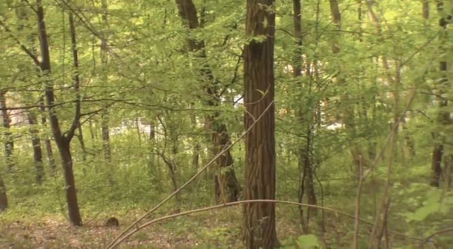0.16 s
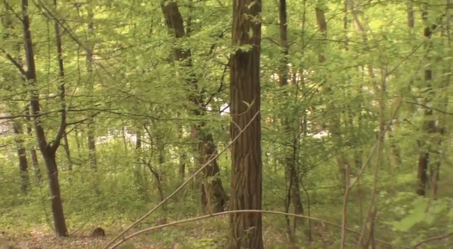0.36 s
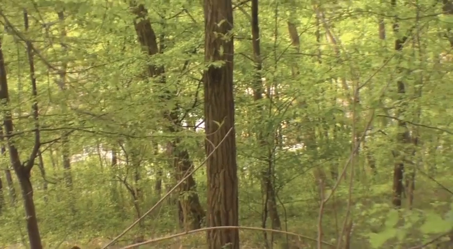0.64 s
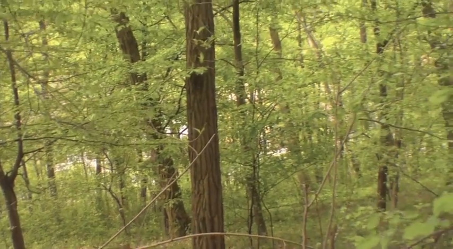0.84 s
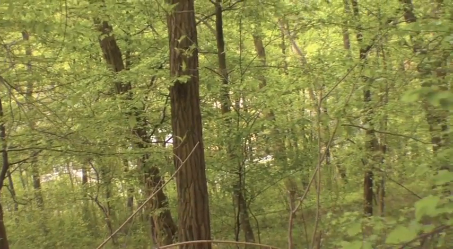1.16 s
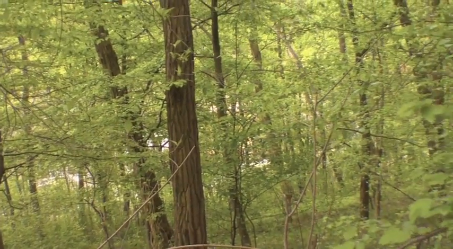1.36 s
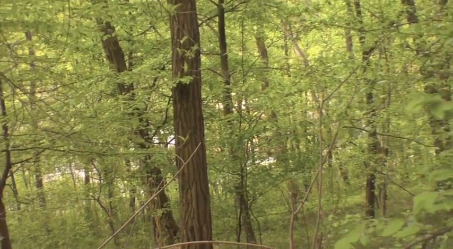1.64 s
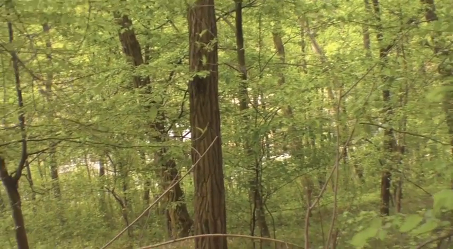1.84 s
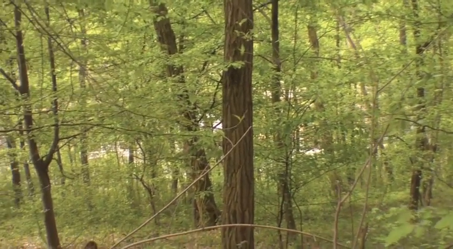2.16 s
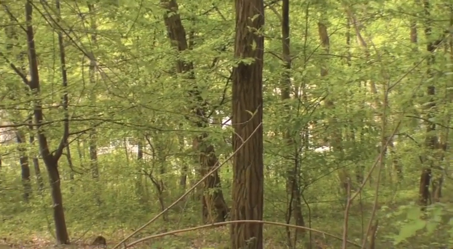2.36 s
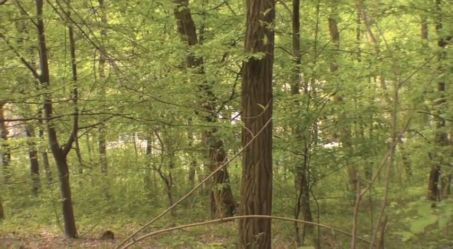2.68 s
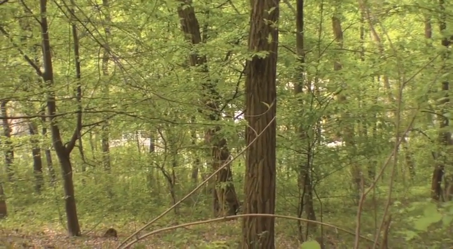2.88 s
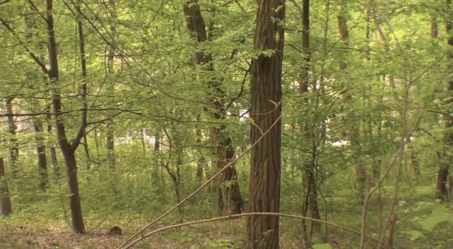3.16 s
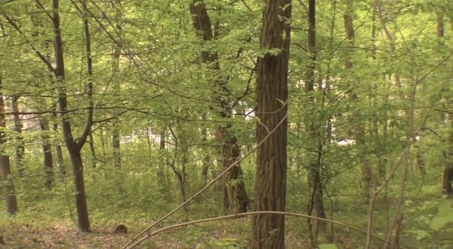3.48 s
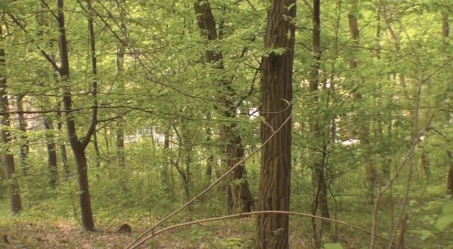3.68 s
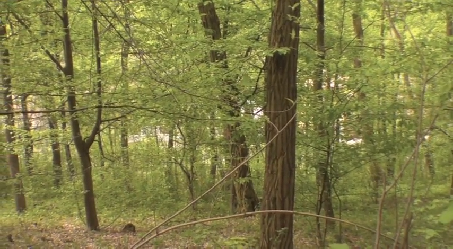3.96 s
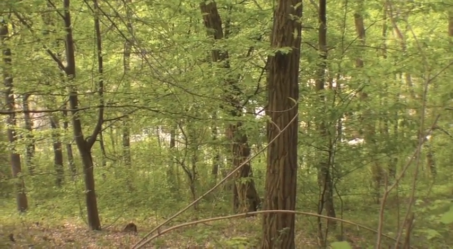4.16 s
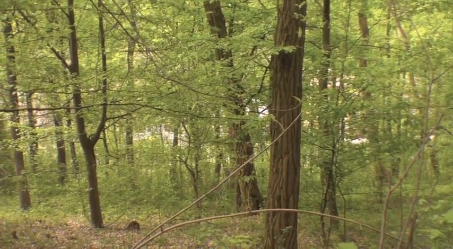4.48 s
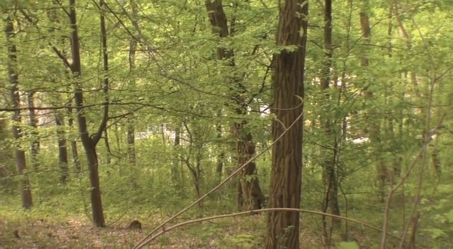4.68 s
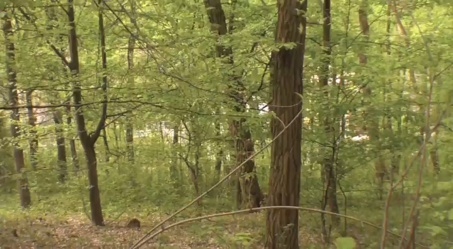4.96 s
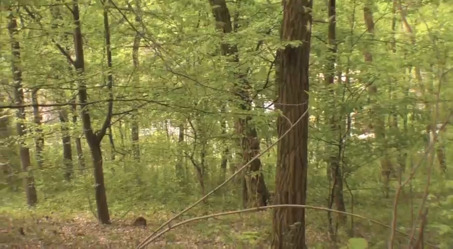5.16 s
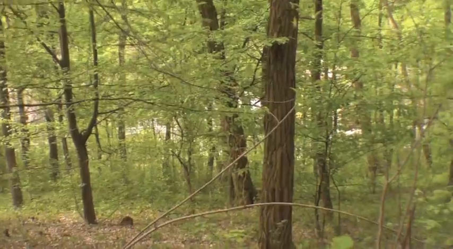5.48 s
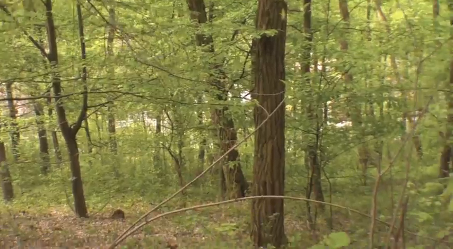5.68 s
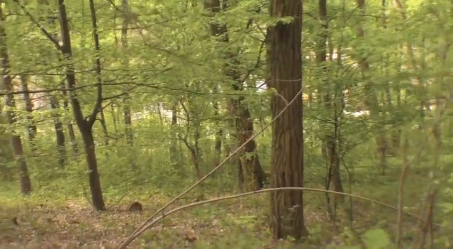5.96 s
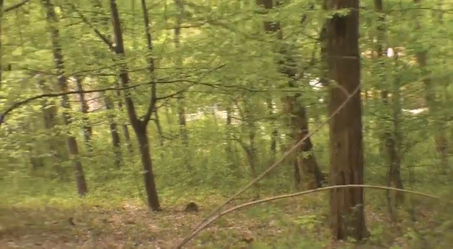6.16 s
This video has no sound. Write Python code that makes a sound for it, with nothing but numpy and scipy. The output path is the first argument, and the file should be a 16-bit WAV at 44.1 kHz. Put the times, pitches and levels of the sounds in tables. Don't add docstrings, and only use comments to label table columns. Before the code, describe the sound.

A stereo microphone stands in a leafy wood, with a soft, bass-heavy hush and a low engine hum from beyond the trees. From 0 to 2 s, small birds are sparse: faint chirps, quick trills and three repeated climb-and-dive phrases between 0.5 and 1.2 s. Tiny dry-leaf ticks come now and then; soft wind thumps pass near 1.3 and 1.9 s. The hum is strongest around 2.6 s. From about 2.8 s, distant flocks thicken the song, with a bright whistle at 3.8 s. Another engine falls in pitch until 4.3 s, then recovers and pulls, while road hiss swells to the end. Between 4.4 and 5.3 s the nearest bird gives clear high glides and two brief lower hoots amid rapid trills. Leaves crackle close by at 5.3-5.6 s, snap again around 6 s, and crunch loudly from 6.2 s until the cut at 6.3 s.

```python
import sys
import numpy as np
from scipy import signal
from scipy.io import wavfile
from scipy.ndimage import map_coordinates

SR = 44100
rng = np.random.default_rng(int(sys.argv[2]) if len(sys.argv) > 2 else 0)


def magnitude_from_level(level_db):
    exponent = np.asarray(level_db, float) / 20
    return 10 ** exponent


def bounce(signal):
    frames = np.transpose(np.atleast_2d(signal))
    limited = np.clip(frames, -1, 1)
    pcm = np.round(limited * 32767).astype(np.int16)
    wavfile.write(sys.argv[1], SR, pcm)


N = 278929
TIME = np.arange(N) / SR

# frequency in Hz, likeness from 0 to 1.
FIELD_LIKENESS = [(40, 0.44), (150, 0.47), (380, 0.88), (950, 0.92), (2400, 0.95), (6000, 0.32),
                  (15000, 0.13)]


def rms_one(x):
    return x / np.sqrt(np.mean(x ** 2) + 1e-20)


def in_time(rows):
    s, *columns = np.transpose(rows)
    return np.array([np.interp(TIME, s, column) for column in columns])


def at_hz(points, hz):
    point_hz, value = np.transpose(points)
    return np.interp(np.log(hz), np.log(point_hz), value)


def drift(rate_hz):
    stride = 40
    pole = np.exp(-2 * np.pi * stride * rate_hz / SR)
    settle = 2000
    white = rng.standard_normal(N // stride + settle + 2)
    slow = signal.lfilter([1], [1, -2 * pole, pole * pole], white)[settle:]
    return np.interp(np.arange(N) / stride, np.arange(len(slow)), rms_one(slow))


def bouts(rows, slopes):
    s, hold, db = np.transpose(rows)[:, :, None]
    swell_db = slopes[0] * np.maximum(s - TIME, 0)
    fade_db = slopes[1] * np.maximum(TIME - s - hold, 0)
    power = np.sum(magnitude_from_level(2 * (db - swell_db - fade_db)), axis=0)
    return 10 * np.log10(power + 1e-30)


def pair(mid, side, alike):
    alike = np.clip(alike, 0, 1)
    return np.sqrt(1 + alike) * mid + np.sqrt(1 - alike) * side * [[1], [-1]]


def banded(source, spectrum, likeness, patchy_db):
    # frequency in Hz, difference in dB.
    left_over_right = [(60, 0), (380, -1), (2380, -0.5), (15000, -1.0)]
    out, edges = 0, 20 * 2 ** np.arange(0, 9.9, .5)
    for k, (low, high) in enumerate(zip(edges, edges[1:])):
        hz = min(np.sqrt(low * high), 14400)
        if spectrum[0][0] < high and low < spectrum[-1][0]:
            band = signal.butter(2, [low, high], "band", fs=SR, output="sos")
            mid, side = signal.sosfilt(band, source[k % len(source)])
            gain = magnitude_from_level(at_hz(spectrum, hz) + patchy_db * drift(8.1))
            lean = magnitude_from_level(np.array([[.5], [-.5]]) * at_hz(left_over_right, hz))
            out = out + gain * lean * pair(mid, side, at_hz(likeness, hz))
    return rms_one(out)


def still_air():
    # frequency in Hz, density in dB per Hz.
    spectrum = [(15, -34), (25, -1), (59, -6), (157, -13.5), (373, -17.5), (575, -14.5), (1020, -19),
                (1480, -19.5), (1840, -23.5), (3250, -21.5), (6380, -35), (11500, -36), (14400, -34.5),
                (16000, -53)]
    noise = rng.standard_normal((2, 2, N))
    return magnitude_from_level(-41 + 0.12 * drift(0.42)) * banded(noise, spectrum, FIELD_LIKENESS, patchy_db=0.5)


def traffic():
    # time in seconds, level in dB.
    passing = [
        (0, -65),
        (3.2, -56),
        (4.5, -47.5),
        (5.2, -47),
        (5.7, -44.5),
        (6.32, -43),
    ]
    # frequency in Hz, density in dB per Hz.
    spectrum = [(150, -2), (300, -1), (700, -1), (1300, -1), (2200, -9), (3500, -12)]
    noise = rng.standard_normal((2, 2, N))
    return magnitude_from_level(in_time(passing)[0]) * banded(noise, spectrum, FIELD_LIKENESS, patchy_db=3.5)


def engines():
    # time in seconds, firing rate in Hz.
    gears = [
        (3.1, 88.8),
        (3.47, 71.3),
        (3.8, 57.3),
        (3.97, 50.47),
        (4.29, 47.55),
        (4.53, 66.8),
        (5.66, 66.8),
        (5.85, 68.8),
        (6.32, 69.6),
    ]
    # start in seconds, hold in seconds, level in dB.
    pulls = [
        (3.3, 3.1, -48),
        (3.68, 0.24, -34.5),
        (4.47, .01, -36.5),
        (5.03, 0.59, -34),
        (6.07, 0.019, -33.5),
    ]
    # time in seconds, firing rate in Hz, level in dB, second order in dB.
    steady = [
        (0, 44.2, -47.5, -49.5),
        (1.9, 46.72, -49, -54),
        (2.6, 47.34, -41.5, -52.5),
        (3.5, 48.23, -47, -61),
        (6.32, 48.7, -50.5, -54),
    ]
    hz, db = in_time(gears)[0], bouts(pulls, (53, 59))
    shifting = magnitude_from_level(db + 0.63 * drift(16.0)) * np.sin(2 * np.pi * np.cumsum(hz) / SR)
    hz, db, second_db = in_time(steady)
    phase = 2 * np.pi * np.cumsum(hz) / SR + .5 * drift(2.0)
    drone = magnitude_from_level(db + 1.7 * drift(21.0)) * np.sin(phase)
    drone += magnitude_from_level(second_db + 1.0 * drift(6.7)) * np.sin(2 * phase)
    return np.sqrt(2) * (shifting + drone) * magnitude_from_level(np.array([[.8], [-.8]]))


def wind():
    # start in seconds, hold in seconds, level in dB.
    gusts = [
        (1.28, 0.021, -41.5),
        (1.87, .02, -34.5),
    ]
    band = signal.butter(3, [14, 36], "band", fs=SR, output="sos")
    lumps = signal.sosfilt(band, rng.standard_normal((2, N)))
    breeze = magnitude_from_level(-57.5 + 2.5 * TIME)
    return (breeze + magnitude_from_level(bouts(gusts, (87, 61)))) * rms_one(pair(*lumps, 0.12))


def leaves():
    # start in seconds, hold in seconds, crackle level in dB.
    tread = [(0, 0.24, -65), (2.17, 0.22, -61.5), (5.3, 0.79, -56.5), (5.32, 0.046, -53), (5.4, 0.1, -49),
             (5.47, 0.028, -53), (5.52, 0.053, -44), (5.57, 0.016, -42.5), (6.09, 0.091, -50.5),
             (6.227, 0.046, -23), (6.3, .03, -23)]
    # start in seconds, peak in dB, ringing frequency in Hz.
    snaps = [(0.064, -32, 12300), (0.0997, -38, 10900), (0.129, -35, 8020), (0.524, -35, 7860),
             (1.1478, -40, 8070), (1.7968, -40, 12100), (2.28, -36, 11000), (3.106, -32.5, 8110),
             (3.506, -27, 13500), (3.507, -38, 7000), (4.4603, -35, 7550), (5.2215, -39, 12400),
             (5.2676, -40, 7150), (5.314, -34, 10700), (5.3642, -32, 8820), (5.403, -29, 13260),
             (5.4454, -33, 13600), (5.4618, -31, 10600), (5.5253, -24, 12350), (5.546, -20.5, 7000),
             (5.6287, -37, 13100), (5.8423, -29, 10940), (5.868, -30, 8200), (6.0586, -35, 8300),
             (6.0796, -33, 9900), (6.139, -31, 12560), (6.177, -47, 11400), (6.207, -10, 12400),
             (6.202, -18, 5160), (6.27, -23, 8980), (6.316, -9.5, 7000)]
    # frequency in Hz, density in dB per Hz.
    crackle = [(900, -33), (1600, -10.5), (2700, -10), (4700, -5.5), (7000, -6), (9000, -13), (12000, -6),
               (15000, 10)]
    crunch = [(130, -3), (280, 2.5), (600, 6.5), (1200, -0.5), (2500, 2), (4000, -43)]
    # frequency in Hz, left-right likeness from 0 to 1.
    likeness = [(200, 1), (4000, 1), (12000, 0.81)]
    breaks_per_s, snap_decay_s = 11000, .0008
    sizes = magnitude_from_level(1.1 * np.minimum(rng.exponential(1, (3, 1, N)), 4))
    happens = rng.random((3, 1, N)) < breaks_per_s / SR
    breaks = sizes * rng.standard_normal((3, 2, N)) * happens + 1e-18
    out = magnitude_from_level(4.5) * banded(breaks, crackle, likeness, patchy_db=0.9)
    out += magnitude_from_level(-7.0) * banded(breaks, crunch, likeness, patchy_db=.5)
    out *= magnitude_from_level(bouts(tread, (600, 300)))
    t = np.arange(200) / SR
    for s, db, hz in snaps:
        band = signal.butter(2, [0.75 * hz, min(1.25 * hz, 18000)], "band", fs=SR, output="sos")
        snap = signal.sosfilt(band, rng.standard_normal(len(t)) * np.exp(-t / snap_decay_s))
        snap = magnitude_from_level(db) * snap / np.max(np.abs(snap)) * magnitude_from_level(np.array([[-.6], [.6]]))
        at = int(s * SR)
        out[:, at:at + len(t)] += snap[:, :N - at]
    return out


def add(out, s, length, first_hz, middle_hz, last_hz, db, fade_db=0, swell_db=0):
    u = np.linspace(0, 1, max(int(length * SR), 8))
    hz = first_hz * 2 * (u - .5) * (u - 1) + middle_hz * 4 * u * (1 - u) + last_hz * 2 * u * (u - .5)
    phase = 2 * np.pi * np.cumsum(hz) / SR
    edge = np.clip(np.minimum(u, 1 - u) * length / 0.0034, 0, 1)
    edge = edge * magnitude_from_level(-fade_db * u ** 2 - swell_db * (2 * u - 1) ** 2)
    note = magnitude_from_level(db) * np.sqrt(2) * edge * (np.sin(phase) + magnitude_from_level(-29) * np.sin(2 * phase))
    at = int(s * SR)
    out[at:at + len(u)] += note[:N - at]


def glide(s, length, hz, rise_hz, db):
    early = 0.593
    return s, length, hz - early * rise_hz, hz, hz + (1 - early) * rise_hz, db


def arch(s, length, hz, depth, db):
    return s, length, hz * (1 - depth), hz, hz * (1 - depth), db


def hook(s, length, hz, rise_hz, db):
    return s, length, hz - rise_hz, hz - (1 - 0.66) * rise_hz, hz, db


def singers(notes, flutter_db):
    out = np.zeros(N)
    for note in notes:
        add(out, *note)
    tremble = np.arange(N) + 1.0 * drift(45.0)
    return map_coordinates(out, [tremble], order=3) * magnitude_from_level(flutter_db * drift(70.0))


def phrase(s, turn, db, dive_db):
    climb_hz, dive_hz = (2360, 3150, 4150), (3550, 2850, 2390, 2130, 1880)
    pip_s, climb_s, plunge_s, dive_s = .022, .045, .024, .056
    return [glide(s - pip_s, pip_s, 2270, 120, db - 3.0),
            (s, climb_s, *climb_hz, db, 7),
            (s + turn, plunge_s, *dive_hz[:3], dive_db - 4, -4),
            (s + turn + plunge_s - .003, dive_s - plunge_s, *dive_hz[2:], dive_db, 7)]


def song():
    # start of the climb in seconds, seconds until the dive, level in dB, dive level in dB.
    phrases = [
        (.51, .058, -43, -43),
        (.775, .057, -42, -47),
        (1.05, .054, -45, -43),
    ]
    # start in seconds, middle in Hz, drop in Hz, level in dB.
    flicks = [(0.132, 4040, 530, -49), (.618, 3330, 697, -45), (1.357, 5200, 850, -51),
              (1.663, 3280, 750, -47.5), (2.163, 3980, 700, -53), (2.264, 3600, 1190, -46),
              (2.327, 4050, 1610, -49), (2.382, 2900, 450, -51), (2.633, 2820, 600, -54),
              (2.711, 4210, 1000, -41), (2.736, 2840, 1000, -53), (2.998, 3020, 820, -44),
              (3.201, 3080, 500, -50), (3.522, 3220, 400, -45), (4.522, 3906, 360, -56),
              (1.747, 3550, 500, -47), (4.11, 3247, 400, -45), (4.935, 3150, 450, -45),
              (.848, 3000, 900, -50), (5.968, 6400, 1720, -43.5), (1.733, 5350, 300, -59),
              (2.612, 4050, 600, -55)]
    # start and length in seconds, middle in Hz, dB.
    slides = [(.575, 0.036, 5820, -60), (2.341, 0.026, 3150, -45), (2.853, 0.04, 2873, -53),
              (3.035, 0.057, 2516, -49), (3.122, 0.017, 4950, -48), (3.2, 0.045, 6800, -63),
              (3.332, 0.13, 2610, -56), (3.542, 0.051, 2670, -44.5), (3.907, 0.099, 3530, -50),
              (4.106, 0.016, 5700, -53), (3.345, 0.074, 3940, -52), (5.31, 0.037, 5740, -41.5),
              (5.374, 0.034, 4110, -44), (3.589, 0.04, 2490, -46)]
    # start and length in seconds, middle in Hz, rise in Hz, level in dB.
    rises = [(.01, 0.013, 3120, 600, -47), (.08, 0.012, 2970, 600, -43), (.154, 0.017, 3100, 498, -49),
             (.695, .05, 3340, 300, -49.5), (1.991, 0.0096, 4960, 1097, -53),
             (2.66, 0.022, 4170, 1100, -44), (2.768, 0.033, 3510, 480, -43), (2.624, .012, 3180, 298, -47),
             (3.03, .028, 3330, 650, -44), (3.505, .022, 3680, 102, -43), (3.414, 0.066, 5400, 502, -73),
             (3.63, 0.096, 5650, 448, -64), (3.795, 0.081, 5300, 500, -56), (3.949, 0.042, 2870, 143, -43),
             (4.087, 0.039, 3730, 123, -43), (4.127, 0.052, 2830, -480, -40),
             (4.745, 0.24, 3770, -130, -50), (5.161, 0.0235, 3565, 261, -36),
             (4.364, 0.053, 3206, 258, -36), (4.655, 0.039, 2850, 702, -41.5), (4.69, .02, 4100, 1500, -43),
             (4.855, .02, 3315, 1500, -46), (5.243, 0.025, 3515, 150, -35), (5.731, 0.017, 2890, 500, -43),
             (1.488, 0.014, 3390, 900, -52), (2.802, .03, 2920, -700, -41)]
    # start and length in seconds, top in Hz, rise in Hz, level in dB.
    hooks = [
        (0.487, 0.05, 4160, 550, -47.5),
        (5.05, .025, 4420, 400, -47),
        (5.15, .02, 4610, 300, -48),
        (5.225, .022, 4580, 550, -45),
        (5.794, 0.052, 3280, 616, -41.5),
        (5.871, 0.027, 3110, 448, -38.5),
        (3.0, 0.0274, 3800, 350, -44),
    ]
    # start and length in seconds, pitch in Hz, level in dB.
    held = [(.303, 0.016, 3820, -47), (.715, 0.059, 3510, -51), (1.366, 0.05, 5720, -56.5),
            (1.715, 0.022, 5460, -51), (2.054, 0.045, 3200, -56), (2.324, 0.02, 4150, -48.5),
            (2.632, .038, 3655, -44), (2.68, .036, 4790, -46), (3.135, 0.083, 2520, -52.5),
            (3.957, 0.059, 2657, -47.5), (3.578, 0.22, 2320, -57), (3.648, 0.052, 3820, -48.5),
            (3.84, 0.059, 2860, -46.5), (4.167, 0.057, 2597, -42.5), (3.205, .065, 4300, -50),
            (3.635, .03, 4300, -50), (4.355, .02, 4650, -49), (4.87, .035, 4380, -48), (4.5, .1, 4520, -53),
            (5.19, .035, 3530, -47), (4.9, .04, 3800, -45), (5.085, .025, 4950, -49),
            (4.421, 0.035, 3257, -41.5), (4.423, 0.047, 3000, -45), (4.468, 0.057, 2983, -38.5),
            (3.212, .04, 3270, -49), (3.478, .045, 2470, -48.5), (3.637, 0.062, 2400, -53),
            (3.969, 0.048, 5230, -53), (4.3, .1, 2575, -55), (4.648, .02, 3800, -47),
            (4.83, 0.26, 5300, -62), (5.098, 0.027, 4310, -49), (5.268, 0.037, 3460, -41.5),
            (4.776, 0.024, 2890, -63), (5.227, .012, 3600, -35), (5.69, .11, 3915, -52),
            (5.963, .024, 5700, -45), (5.745, 0.022, 3400, -45), (5.905, 0.034, 3010, -43),
            (5.956, .015, 3120, -46), (5.983, .013, 3100, -43), (2.2, 0.083, 3320, -53.5),
            (2.251, 0.018, 4900, -57), (2.288, .015, 4900, -56), (2.252, 0.022, 4270, -47),
            (2.686, .046, 3660, -45)]
    # start and length in seconds, top in Hz, level in dB.
    arches = [
        (2.01, 0.023, 3255, -42.5),
        (2.177, .022, 3310, -44.5),
        (3.054, .031, 3770, -38),
        (3.642, 0.044, 2660, -47),
        (3.784, 0.036, 3280, -33.5),
        (3.36, 0.056, 2900, -53),
        (5.329, 0.061, 5680, -41.5),
    ]
    notes = [(.318, 0.048, 3210, 2570, 2070, -44, 8)]
    for row in phrases:
        notes += phrase(*row)
    notes += [hook(*row) for row in hooks]
    notes += [glide(s, 0.0176, hz, -drop_hz, db) for s, hz, drop_hz, db in flicks]
    notes += [glide(s, length, hz, -0.081 * hz, db) for s, length, hz, db in slides]
    notes += [glide(*row) for row in rises]
    notes += [arch(s, length, hz, 0, db) for s, length, hz, db in held]
    notes += [arch(s, length, hz, 0.0553, db) for s, length, hz, db in arches]
    return singers(notes, flutter_db=2.4)


def chorus(level_db, low_hz, high_hz, count=480):
    out = np.zeros(N)
    for when, long, pitch, steep, loud in rng.random((count, 5)):
        at = int(when * (N - 1))
        span_hz = (.12 + .22 * steep) * (high_hz - low_hz) * (1 - .75 * long)
        fall_hz = span_hz if loud * 7 % 1 < .65 else -span_hz
        hz = low_hz + span_hz / 2 + pitch * (high_hz - low_hz - span_hz)
        length = .008 + .05 * long ** 2
        add(out, at / SR, length, hz + fall_hz / 2, hz, hz - fall_hz / 2, level_db[at] - 8 * loud)
    return out


def flocks():
    # start in seconds, hold in seconds, level in dB.
    high_bouts = [
        (0, .6, -75),
        (2.85, 1.15, -46.5),
        (4.4, 0.18, -47.5),
        (5.9, .4, -59),
    ]
    low_bouts = [
        (0, 0.068, -54),
        (3.6, 0.67, -46),
        (4.7, 0.29, -43.5),
        (5.9, .01, -53),
    ]
    high = chorus(bouts(high_bouts, (58, 31)), 3500, 5800)
    return high + chorus(bouts(low_bouts, (33, 42)), 2242, 3900)


def trillers():
    # start in seconds, repeats per second, top in Hz, drop in Hz, level in dB.
    trill_rows = [(.246, 63, 5300, 1190, -49), (.245, 34, 4440, 300, -53), (2.43, 35.4, 6030, 300, -57),
                  (2.632, 29, 5875, 250, -53), (2.87, 45, 5980, 350, -56), (3.057, 48, 5800, 885, -59),
                  (4.674, 41, 5000, 2280, -49), (4.87, 100, 4840, 1530, -42), (5.034, 44, 4790, 1090, -46),
                  (5.234, 52, 4970, 900, -48), (3.62, 45, 2850, 496, -51), (4.655, 59, 3066, 605, -42),
                  (4.7, 62, 2650, 620, -48.5), (5.992, 46, 7140, 1500, -60), (3.92, 52, 4030, 600, -48.5),
                  (4.0, 80, 4100, 800, -56)]
    beats = 5
    out = np.zeros(N)
    for s, per_s, top_hz, drop_hz, db in trill_rows:
        for beat in range(beats):
            late, loud, sharp = rng.standard_normal(3)
            start = s + (beat + 0.23 * late) / per_s
            hz = top_hz + 0.122 * drop_hz * sharp
            add(out, start, 0.784 / per_s, hz, hz - 0.434 * drop_hz, hz - drop_hz, db + 4.4 * loud)
    return out


def nearest_singer():
    # start and length in seconds, middle in Hz, rise in Hz, level in dB.
    glides = [
        (3.214, .104, 2763, -180, -38),
        (4.451, .027, 5170, -330, -30),
        (.335, .118, 2850, -10, -49),
        (4.735, .088, 5343, -24, -36.5),
        (5.06, .105, 3550, -40, -43),
    ]
    # start in seconds, top in Hz, level in dB.
    hoots = [
        (4.868, 2270, -37),
        (5.008, 2324, -35.5),
    ]
    # start and length in seconds, first, middle and last pitch in Hz.
    growing = [
        (4.375, .079, 5500, 5400, 5370),
        (4.62, .118, 5450, 5235, 5340),
    ]
    grown_db, grows_db = -35.0, 7.0
    notes = [glide(*row) for row in glides]
    notes += [(*row, grown_db - grows_db, -grows_db) for row in growing]
    notes += [(*arch(s, .066, hz, 0.169, db), 0, 7) for s, hz, db in hoots]
    return singers(notes, flutter_db=1.3)


def trunks(x):
    t60_s, likeness = 0.71, 0.82
    t = np.arange(SR) / SR
    tail = rng.standard_normal((2, SR)) * magnitude_from_level(-60 * t / t60_s) * np.minimum(t / 0.012, 1)
    dull = signal.lfilter([.45], [1, -.55], tail)
    tail = dull + (tail - dull) * np.exp(-t / 0.027)
    tail = pair(*tail, likeness) / np.sqrt(np.sum(tail ** 2))
    return signal.fftconvolve(x[None], tail, axes=1)[:, :N]


def scene():
    ground = still_air() + traffic() + engines() + wind() + leaves()
    middle, far, trills, close = song(), flocks(), trillers(), nearest_singer()
    direct = close + middle + magnitude_from_level(-7.0) * trills + magnitude_from_level(-4.0) * far
    scattered = trunks(magnitude_from_level(-8.0) * close + magnitude_from_level(-3.0) * middle + trills + far)
    return direct + scattered + ground


def band_limit(x):
    return signal.sosfilt(signal.butter(12, 16390, fs=SR, output="sos"), x)


def record(dry):
    low_pass = signal.cheby2(20, 45, 15780, fs=SR, output="sos")
    mix = signal.sosfilt(low_pass, dry)
    return band_limit(mix)


dry = scene()
out = record(dry)
bounce(out)
```